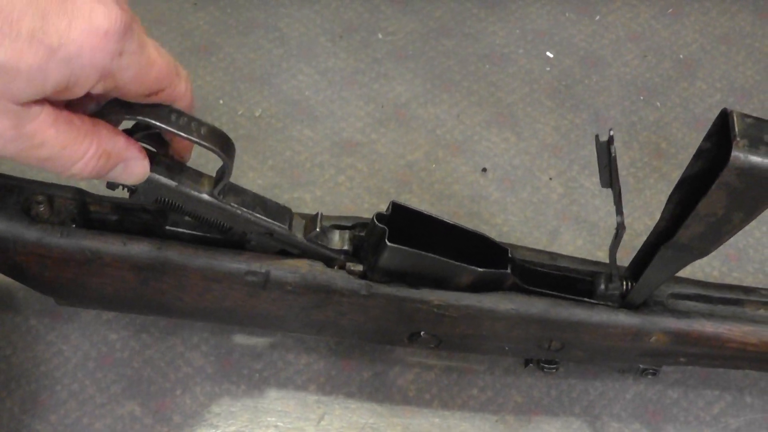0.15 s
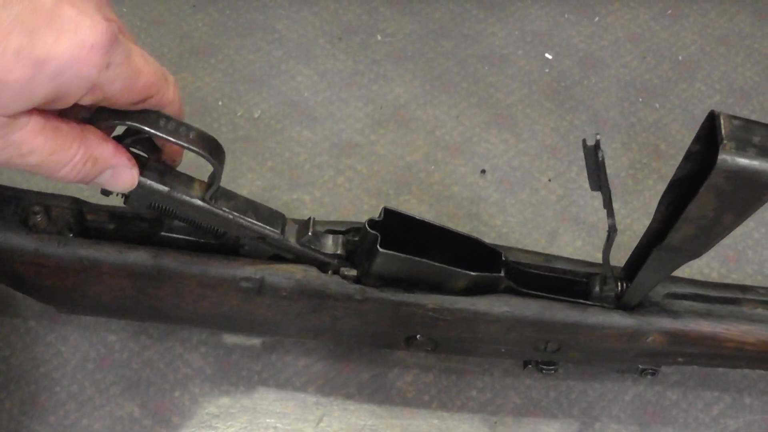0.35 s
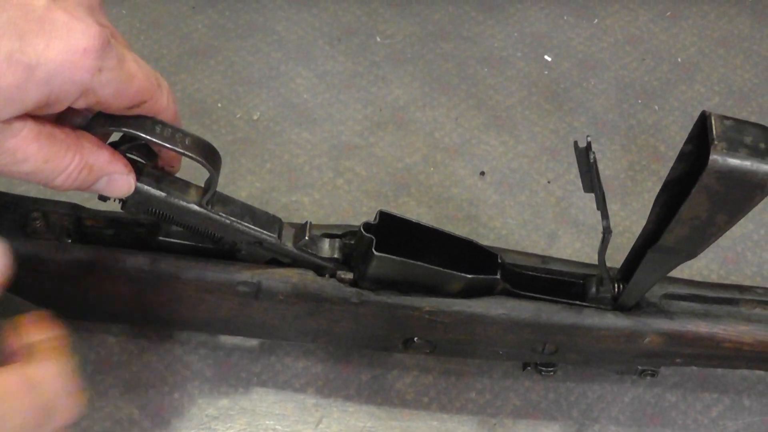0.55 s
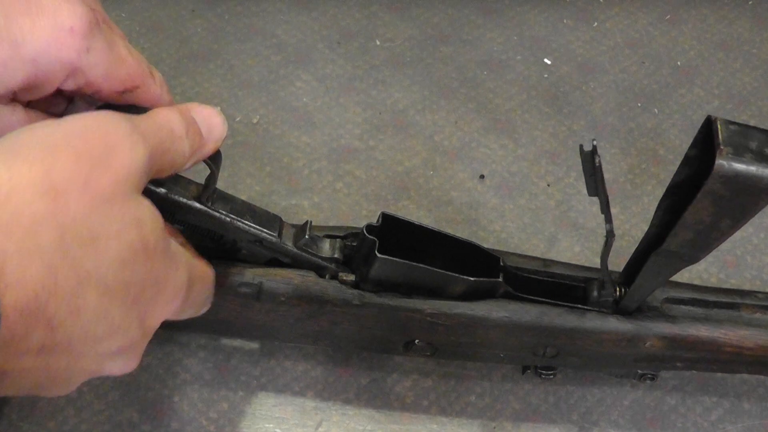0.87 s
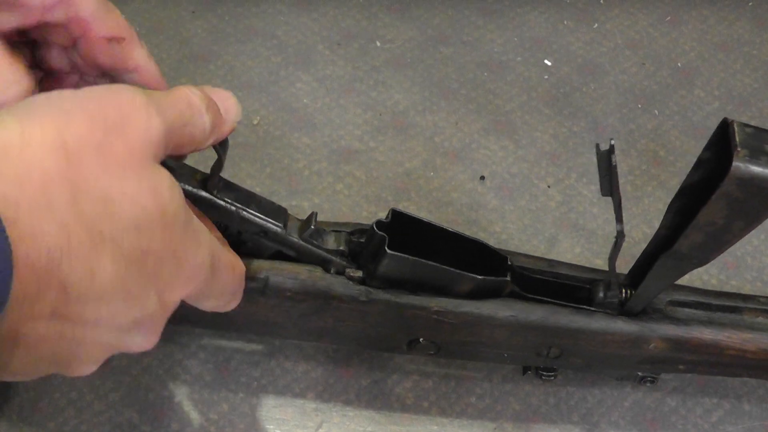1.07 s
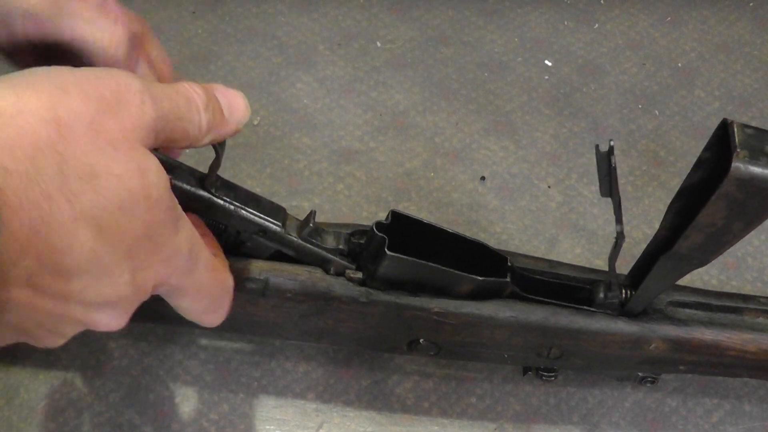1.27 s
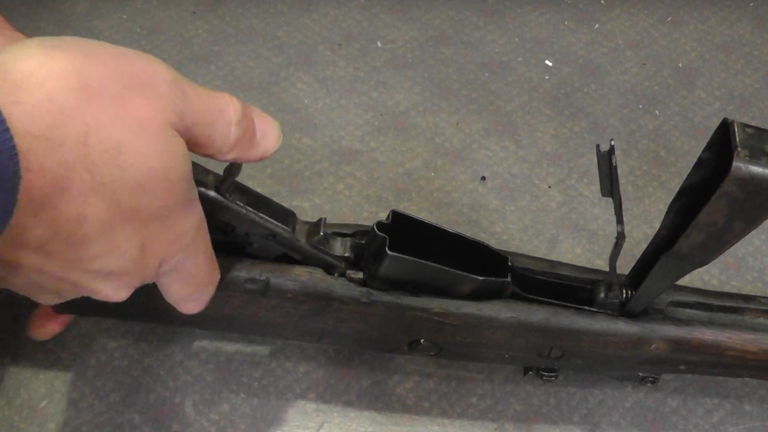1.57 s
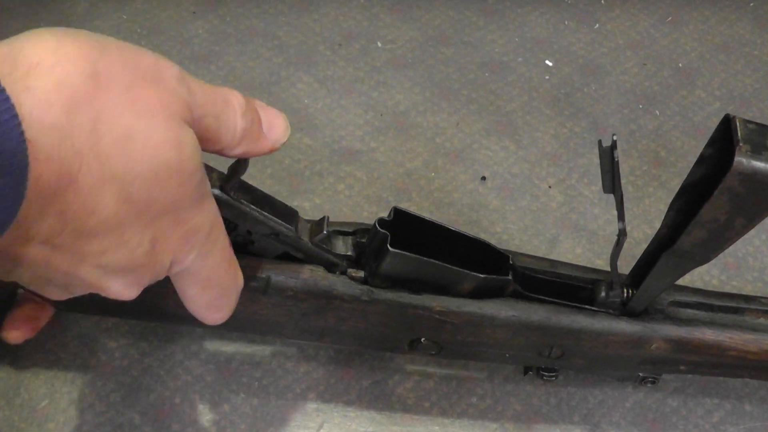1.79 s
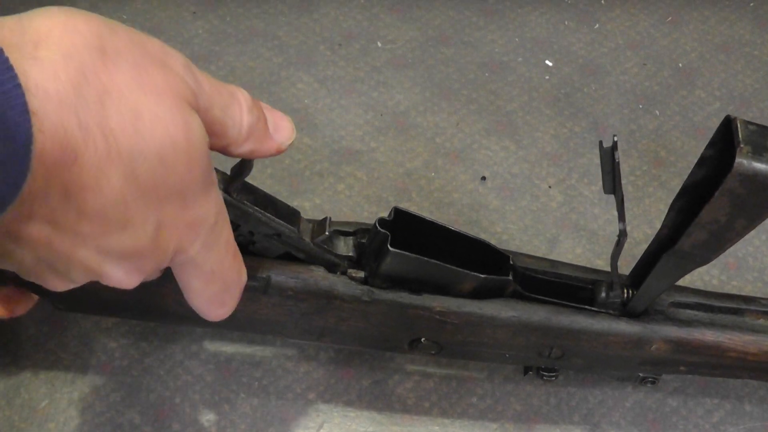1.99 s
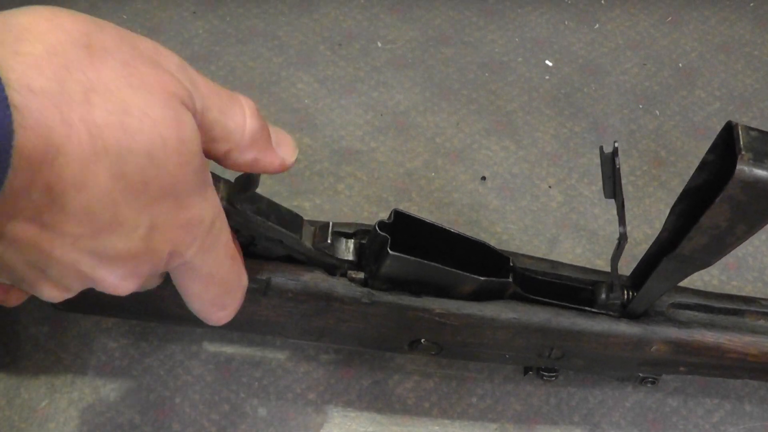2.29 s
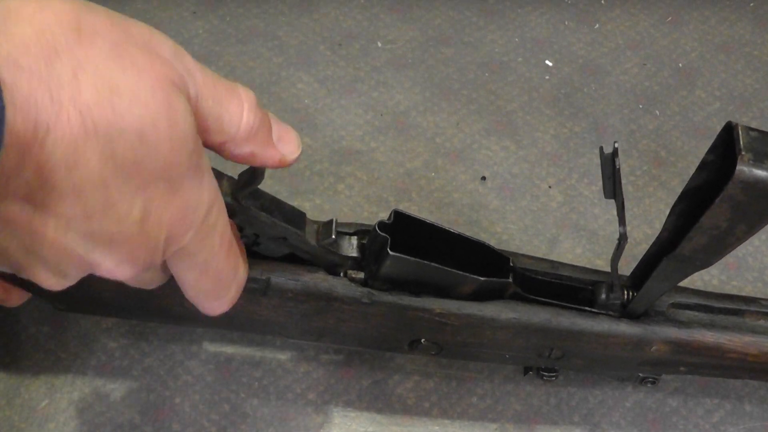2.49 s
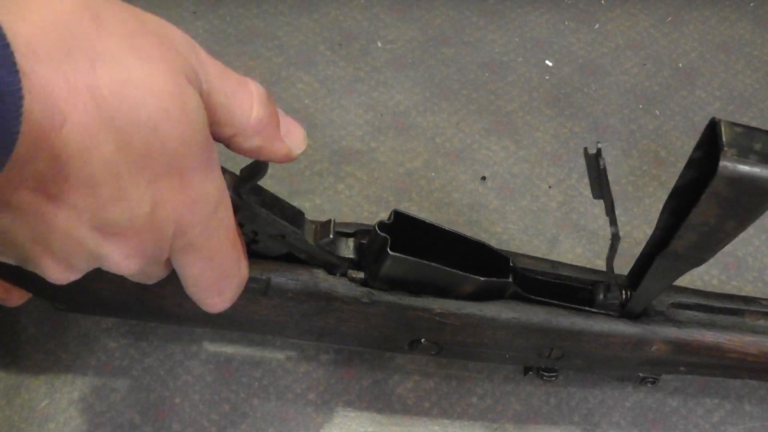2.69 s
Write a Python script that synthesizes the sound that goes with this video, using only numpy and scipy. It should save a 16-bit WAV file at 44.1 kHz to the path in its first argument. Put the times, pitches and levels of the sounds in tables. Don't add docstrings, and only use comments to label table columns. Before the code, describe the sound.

Steel rifle parts fitted together by hand, with scrapes, light clicks and two sharp final knocks

```python
import sys
import numpy as np
from scipy import signal
from scipy.fft import rfft, irfft, next_fast_len
from scipy.io import wavfile
from scipy.ndimage import uniform_filter1d, map_coordinates

SR = 44100
rng = np.random.default_rng(int(sys.argv[2]) if len(sys.argv) > 2 else 0)


def digitize_waveform(pressure):
    field = np.atleast_2d(pressure).T
    bounded = np.clip(field, -1, 1)
    quanta = np.round(bounded * 32767).astype(np.int16)
    wavfile.write(sys.argv[1], SR, quanta)


def ratio_of_db(decibels):
    return 10 ** (np.asarray(decibels, float) / 20)


N = 125685

# time_s, force_db, bright_grit_db
DRAG = [(0, -57, -8), (.1, -54.5, -2.5), (.33, -53.5, -1.5), (.4, -46, -3), (.54, -45, -0.5),
        (.575, -54, -26), (.72, -60, -4.5), (.96, -48, -8), (1.03, -38.5, -3), (1.155, -39.5, -3.5),
        (1.19, -50.5, -28), (1.3, -58, -3), (1.44, -62.5, -1), (1.55, -39, -38), (1.67, -58, -24),
        (1.77, -47, -11), (1.84, -59, -8), (2.3, -71.5, -2)]
# start_s, force_db, t60_s
JERKS = [(0.397, -35.5, 0.051), (.452, -43, 0.11), (0.513, -48.5, 0.095), (.654, -36, 0.066),
         (.695, -41, 0.24), (.966, -59, 0.11), (1.019, -57, 0.17), (1.12, -38, 0.22), (1.522, -48, 0.15),
         (1.583, -37, 0.072), (1.748, -36.5, 0.05), (1.766, -63, 0.033), (2.525, -45, 0.084),
         (2.548, -43.5, 0.13), (2.597, -40.5, 0.11)]
# mode_hz, width_hz, level_db
STOCK_PRESSED = [(107.5, 16, -3), (174.4, 30, 0), (299.4, 36.4, 1), (436, 27.3, 1), (520, 141, -8)]
# mode_hz, width_hz, level_db
STOCK_LIFTED = [(121, 35, 0), (215, 115, 4), (520, 130, 4), (800, 67, -4.5)]
# mode_hz, width_hz, level_db
SHELL = [(830, 540, -3), (1593, 417, 2), (2078, 173, 1), (2760, 420, -9.5), (3580, 630, -9),
         (6700, 2100, -17.5)]
PRESS_S = .6
SLIPS_PER_S = 570
# time_s, level_db
SLIDE = [
    (0, -57),
    (.1, -52.5),
    (.36, -50.5),
    (.55, -55.5),
]
# mode_hz, width_hz, level_db
RAIL = [(1300, 33, -6), (1683, 38, 5.5), (2140, 120, -3.5), (2640, 230, -3), (3930, 500, -19),
        (6400, 110, -15.5)]
# start_s, peak_db, centre_hz, ring_db, t60_s
TICKS = [(0.9689, -24, 7900, -30, 0.0014), (0.9683, -36.5, 4050, -30, 0.0049),
         (1.488, -38.5, 4100, -4, 0.025), (1.575, -18.5, 9040, -8.5, 0.013),
         (1.575, -22.5, 3980, -36, 0.017), (1.7386, -25, 7340, -26, 0.02), (1.7386, -28, 13500, -30, 0.015),
         (1.837, -41, 7150, -22, 0.025), (2.391, -39.5, 9060, -29, 0.011), (2.458, -51, 8640, -37, 0.015),
         (2.559, -36, 8800, -27, 0.016), (2.586, -35, 8400, -21, 0.075), (2.609, -31.5, 5730, -1.5, 0.035),
         (2.7058, -5.5, 10200, -29, 0.008), (2.7075, -17, 5130, 1, 0.012), (2.727, -20, 5760, -10, 0.0062),
         (2.729, -18, 9100, -20, 0.008), (2.7428, -9, 7300, -21.5, 0.0048), (2.7434, -7.5, 6400, -20, 0.01),
         (2.7447, -15.5, 13500, -18, 0.015), (2.7476, -12, 10150, -22, 0.011),
         (2.7475, -18.5, 3980, -24, 0.032)]
# frequency_hz, level_db
CRACK = [(1500, -9.5), (3300, 2.5), (10500, -4), (12000, -7.5), (16000, -9.5)]
# mode_hz, level_db, t60_s
STEEL = [(3160, -9, .08), (3731, -11, .04), (3951, -10, .09), (4590, -13, .07), (5600, 0, .06),
         (6480, -7, .08), (7150, -8, .05), (9076, -7, .025), (10520, -12, .02), (13520, -13, .045)]
# start_s, peak_db, centre_hz, t60_s, left_db
BUMPS = [(.399, -33.5, 520, 0.26, -5.5), (0.457, -29.5, 984, 0.058, -2), (0.518, -56, 222, 0.065, -16),
         (1.416, -40.5, 840, 0.035, 3), (1.488, -24, 1032, 0.05, -1), (1.525, -30, 584, 0.037, 1),
         (1.576, -25.5, 2495, 0.031, -1), (1.578, -22.5, 1300, 0.01, 4), (2.389, -50, 413, 0.18, 1),
         (2.523, -42.5, 1300, 0.087, 1), (2.552, -32, 620, 0.047, 1), (2.748, -30.5, 695, 0.12, 2),
         (2.604, -29, 2030, 0.026, 0.5), (2.706, -23.5, 115, 0.01, -33), (2.705, -21.5, 510, 0.02, -5),
         (2.74, -24, 86, 0.046, 8), (2.745, -22, 214, 0.035, -2.5), (2.7445, -16.5, 2090, 0.017, 1)]
STOCK_RING_DB = -18
# start_s, length_s, level_db
SCRAPES = [
    (1.514, 0.032, -49.5),
    (2.519, 0.041, -53.5),
    (2.579, 0.038, -42),
]
# start_s, length_s, level_db
RATTLE = (2.708, .03, -39)
# start_s, peak_db
TAPS = [
    (.626, -32),
    (.658, -30),
    (.798, -35),
    (.832, -22.5),
    (.867, -38),
]
# start_s, peak_db, mode_hz, t60_s
THUDS = [(0, -47, 100, 0.3), (.002, -40, 199, 0.1), (1.49, -16.5, 184, 0.046), (2.259, -53, 179, 0.19),
         (.335, -41, 172, 0.13), (.51, -41.5, 112, 0.18), (.61, -47, 103, 0.13), (0.884, -44, 109, 0.2),
         (0.993, -56, 105, 0.15), (1.049, -40, 107.6, 0.36), (1.061, -49, 170, .2), (1.142, -39, 102, 0.45),
         (1.22, -49, 97.5, .4), (1.238, -54, 173, 0.14), (1.306, -48.5, 96, 0.26),
         (1.401, -59.5, 113.7, .3), (1.577, -44.5, 109, 0.24), (1.579, -46, 179, .2),
         (1.745, -52.5, 181, 0.3), (2.388, -40.5, 170.2, 0.17), (2.592, -46, 162.8, 0.19),
         (2.701, -28, 44.6, 0.16), (2.738, -42, 44.5, .12), (2.782, -53, 99, 0.34)]
THUD_RISE_S = 0.0097
# frequency_hz, side_over_mid_db
THUD_WIDE = [(40, 5), (100, -1), (200, -4)]
# frequency_hz, phase_rad
THUD_TURN = [(40, 1.8), (200, 1.8)]
# frequency_hz, side_over_mid_db
NEAR_WIDE = [(60, -38), (250, -13), (900, -3.5), (2400, -4.5), (5000, -17), (8100, -9.5), (15000, -4)]
# frequency_hz, phase_rad
TURN = [(100, 1.75), (500, 2.1), (1500, 1.37), (5000, 0.63), (9000, 1.1), (14000, 2.6)]
# frequency_hz, level_db
CLOTH = [(150, -8.5), (500, 2), (1800, -1), (4000, -8), (6600, -5), (11000, -13), (16000, -12.5)]
# time_s, level_db
SLEEVE = [(0, -75), (.38, -73), (.53, -56), (.61, -53), (.7, -49.5), (.8, -53.5), (.905, -59), (.935, -66),
          (1.13, -63.5), (1.27, -69), (1.55, -62), (1.7, -68.5), (2.0, -66), (2.16, -74.5), (2.3, -72),
          (2.45, -76.5), (2.85, -64.5)]
# frequency_hz, side_over_mid_db
CLOTH_WIDE = [(200, -3), (1300, 1.5), (5200, -7.5), (8100, 0.5), (15000, 1.5)]
# frequency_hz, phase_rad
CLOTH_TURN = [(200, 0.96), (2000, 0.079), (6000, 1.5)]
# frequency_hz, t60_s
ROOM = [(100, .18), (1000, .25), (5000, .18), (14000, .11)]
ROOM_DB = -12
ROOM_DULL_HZ = 4300
# frequency_hz, level_db
AIR = [(40, -6), (85, 4.5), (118, 15), (160, 0.5), (280, 4), (550, 1.5), (1000, -6), (3500, -14),
       (16000, -20.5)]
AIR_DB = -56.5
# frequency_hz, side_over_mid_db
AIR_WIDE = [(60, -8.5), (900, -5), (2400, -14.5), (5000, -21), (8100, -6), (15000, -1)]
# centre_hz, width_hz, depth_0_to_1
NOTCHES = [(1775, 166, 1), (2393, 120, 1), (3040, 91, 1)]
TOP_HZ = 15750


def unit(x):
    return x / np.sqrt(np.mean(x ** 2) + 1e-20)


def along(points, hz):
    f, v = np.transpose(points)
    return np.interp(np.log(hz + 1), np.log(f + 1), v)


def curves(rows):
    s, *cols = np.transpose(rows)
    return [np.interp(np.arange(N) / SR, s, c) for c in cols]


def wobble(rate):
    return map_coordinates(rng.standard_normal(N // 100), [np.arange(N) * rate / SR])


def filtered(x, response):
    m = next_fast_len(x.shape[-1] + 8192)
    spectrum = rfft(x, m) * response(np.fft.rfftfreq(m, 1 / SR))
    return irfft(spectrum, m)[..., :x.shape[-1]]


def resonance(f, centre, width):
    return 1j * f * width / (centre * centre - f * f + 1j * f * width)


def body(peaks):
    return lambda f: sum((-1) ** k * ratio_of_db(db) * resonance(f, c, w) for k, (c, w, db) in enumerate(peaks))


def grains(rate, spread_db):
    size = ratio_of_db(spread_db * np.minimum(rng.exponential(size=N), 3))
    slips = rng.random(N) < rate / SR
    return unit(rng.standard_normal(N) * (1 + size * slips))


def ports(x, wide, turn, loose):
    mixed = x[0] + loose * x[1]
    side = filtered(mixed, lambda f: ratio_of_db(along(wide, f)) * np.exp(1j * along(turn, f))) / np.hypot(1, loose)
    return np.array([x[0] + side, x[0] - side])


def stock():
    force_db, grit_db = curves(DRAG)
    t = np.arange(N) / SR
    jerks = sum((t > s) * ratio_of_db(db - 60 * abs(t - s) / t60) for s, db, t60 in JERKS)
    friction = np.array([grains(SLIPS_PER_S, spread_db=4) for _ in range(2)])
    rub = friction * (ratio_of_db(force_db) + jerks) * ratio_of_db(1.5 * wobble(70))

    def rung(peaks):
        return filtered(rub, body(peaks)) / np.std(filtered(rng.standard_normal(N), body(peaks)))

    wood = np.where(t < PRESS_S, rung(STOCK_LIFTED), rung(STOCK_PRESSED))
    return wood + ratio_of_db(grit_db) * rung(SHELL)


def slide():
    moving = np.arange(N) < SLIDE[-1][0] * SR
    strength = ratio_of_db(curves(SLIDE)[0] + 0.22 * wobble(52))
    return moving * strength * unit(filtered(rng.standard_normal((2, N)), body(RAIL)))


def ticks():
    out, t = np.zeros(N + SR), np.arange(SR // 4) / SR
    for s, db, hz, ring_db, t60 in TICKS:
        burst = ratio_of_db(-60 * t / t60) * rng.standard_normal(len(t))
        spill = ratio_of_db(.35 * db - 9)
        centre = body([(hz, .36 * hz, 0)])
        crack = filtered(burst, lambda f: ratio_of_db(along(CRACK, f)) * (spill + centre(f) ** 2))
        ring = np.zeros(len(t))
        for f, level, decay in STEEL:
            mode_db = level + rng.normal(0, 1.5) - 15 * abs(np.log2(f / hz))
            ring += ratio_of_db(mode_db - 60 * t / decay) * np.sin(2 * np.pi * f * t)
        out[round(s * SR):][:len(t)] += ratio_of_db(db) * (crack / abs(crack).max() + ratio_of_db(ring_db) * ring)
    return out[:N]


def bumps():
    out, t = np.zeros((2, N + SR)), np.arange(SR // 4) / SR
    for s, db, hz, t60, left_db in BUMPS:
        decay = ratio_of_db(-60 * t / t60)
        burst = decay * (1 - np.exp(-t / .0012)) * rng.standard_normal(len(t))
        modes = body([(hz, .6 * hz, 0), (3.1 * hz, 2.2 * hz, -12)])
        knock = filtered(burst, lambda f: modes(f) / (1 + 1j * f / 3000) ** 3)
        ring = filtered(burst, body(STOCK_PRESSED))
        tone = decay * (1 - np.exp(-t / 0.00026)) * np.sin(2 * np.pi * hz * t)
        hit = 0.81 * knock / abs(knock).max() + 0.61 * tone
        hit += ratio_of_db(STOCK_RING_DB) * ring / abs(ring).max()
        out[:, round(s * SR):][:, :len(t)] += ratio_of_db(db) * hit * [[1], [np.tanh(left_db / 12)]]
    return out[:, :N]


def scrapes():
    t = np.arange(N) / SR
    push = np.zeros(N)
    for s, length, db in SCRAPES + [RATTLE]:
        release = ratio_of_db(-60 * np.clip(t - s - length, 0, 1) / 0.017)
        push += ratio_of_db(db) * np.clip((t - s) / 0.026, 0, 1) * release
    steel = body([(f, 500, 0.12 * level) for f, level, _ in STEEL[:-1]] + [(13500, 5700, -13)])
    return push * unit(filtered(grains(1600, spread_db=9), steel))


def taps():
    blows = np.zeros(N)
    for s, db in TAPS:
        blows[round(s * SR)] = ratio_of_db(db)
    wood = body([(460, 320, 0), (1700, 1300, -11)])
    tap = filtered(blows, lambda f: wood(f) / (1 + 1j * f / 3200) ** 4)
    return tap * blows.max() / abs(tap).max() * [[1.45], [.55]]


def thuds():
    t = np.arange(N) / SR
    hum = np.zeros(N)
    for s, db, hz, t60 in THUDS:
        since = np.clip(t - s, 0, None)
        swell = (1 - np.exp(-since / THUD_RISE_S)) ** 2
        hum += ratio_of_db(db + 8 - 60 * since / t60) * swell * np.sin(2 * np.pi * hz * since)
    return ports([hum, hum], THUD_WIDE, THUD_TURN, loose=0)


def rustle(spectrum, patchy_db):
    z = signal.stft(rng.standard_normal((2, N)), nperseg=256)[2]
    field = uniform_filter1d(rng.standard_normal(z.shape[1:]), size=6, axis=0)
    field = uniform_filter1d(field, size=10, axis=1)
    pair = signal.istft(z * ratio_of_db(patchy_db * unit(field)), nperseg=256)[1][:, :N]
    return unit(filtered(pair, lambda f: ratio_of_db(along(spectrum, f))))


def sleeve():
    stroke = ratio_of_db(curves(SLEEVE)[0] + 9.5 + 0.6 * wobble(31.8))
    return stroke * ports(rustle(CLOTH, patchy_db=1.7), CLOTH_WIDE, CLOTH_TURN, loose=0.09)


def room(x):
    hz, t, z = signal.stft(rng.standard_normal((2, SR // 2)), SR, nperseg=256)
    hz = hz[:, None]
    decay = ratio_of_db(-60 * t / along(ROOM, hz))
    tail = signal.istft(z * decay / (1 + hz / ROOM_DULL_HZ) * (hz > 0), SR, nperseg=256)[1]
    delayed = np.pad(x, (150, 0))[None]
    return signal.fftconvolve(delayed, tail / np.linalg.norm(tail[0]), axes=1)[:, :N]


def air():
    return ratio_of_db(AIR_DB) * ports(rustle(AIR, patchy_db=.7), AIR_WIDE, TURN, loose=2.5)


def scene():
    rubs = stock() + slide()
    knocks, lean = bumps()
    hits = ticks() + knocks + scrapes()
    near = ports(rubs, NEAR_WIDE, TURN, loose=1.0)
    near += ports([hits, ratio_of_db(-16) * room(hits)[0]], NEAR_WIDE, TURN, loose=1.0)
    echo = ports(ratio_of_db(ROOM_DB) * room(hits + 0.86 * rubs[0]), AIR_WIDE, TURN, loose=4.5)
    return near + lean * [[1], [-1]] + taps() + thuds() + sleeve() + echo + air()


def low_pass(x):
    return signal.sosfilt(signal.butter(12, 16780, fs=SR, output="sos"), x)


def record(dry):
    def mic(f):
        dips = np.prod([1 - np.clip(d, 0, 1) * resonance(f, c, w) for c, w, d in NOTCHES], axis=0)
        bass_cut = (1j * f / (40 + 1j * f)) ** 2
        return dips * bass_cut / (1 + (f / TOP_HZ) ** 90)

    return low_pass(filtered(dry, mic))


dry = scene()
out = record(dry)
digitize_waveform(out)
```